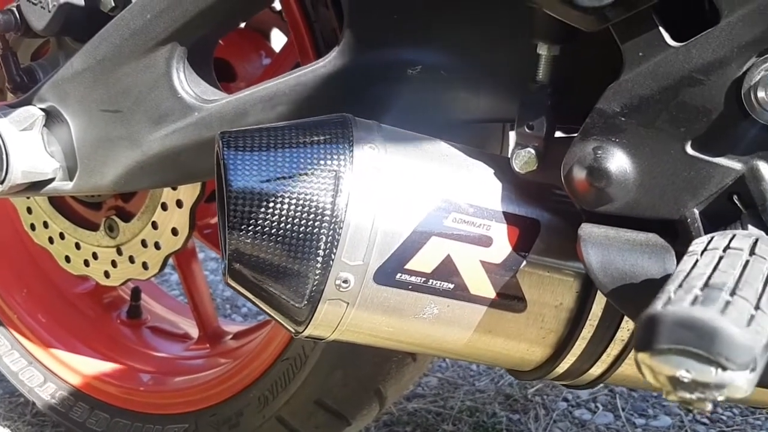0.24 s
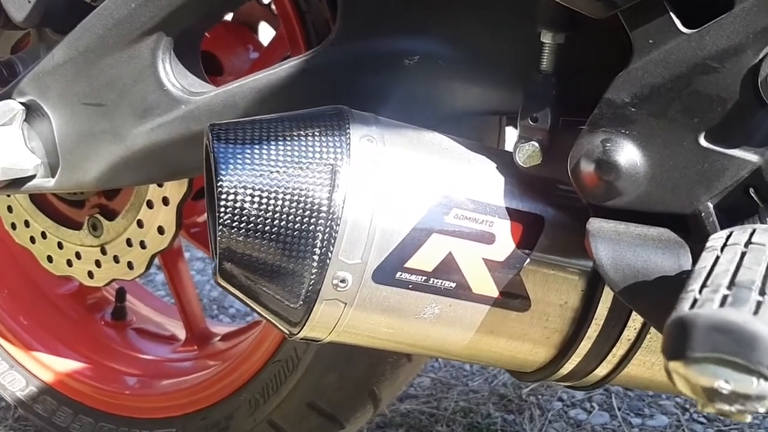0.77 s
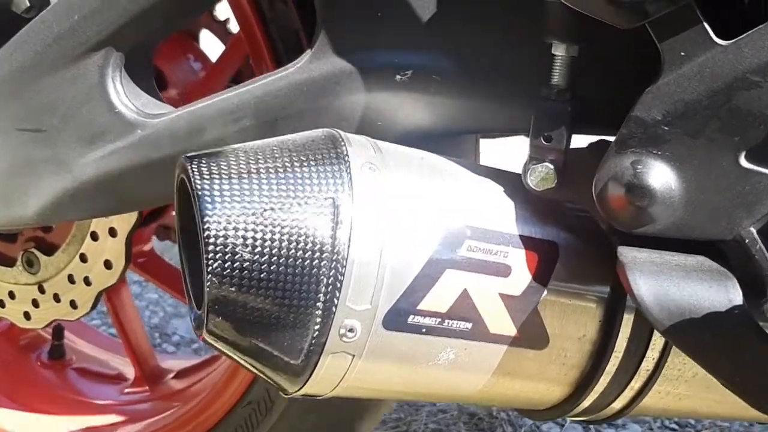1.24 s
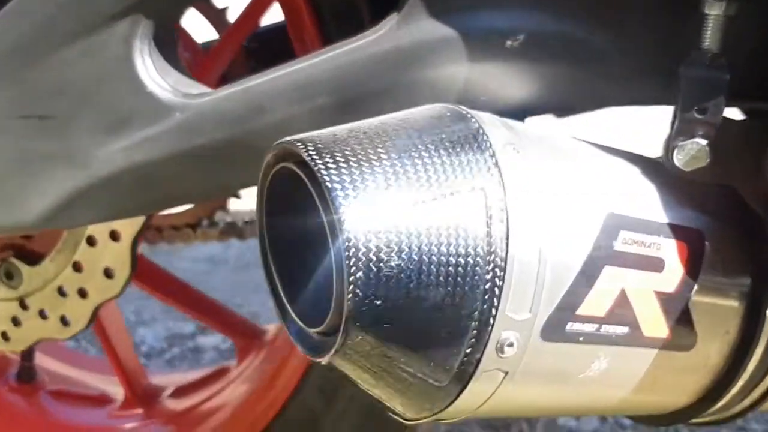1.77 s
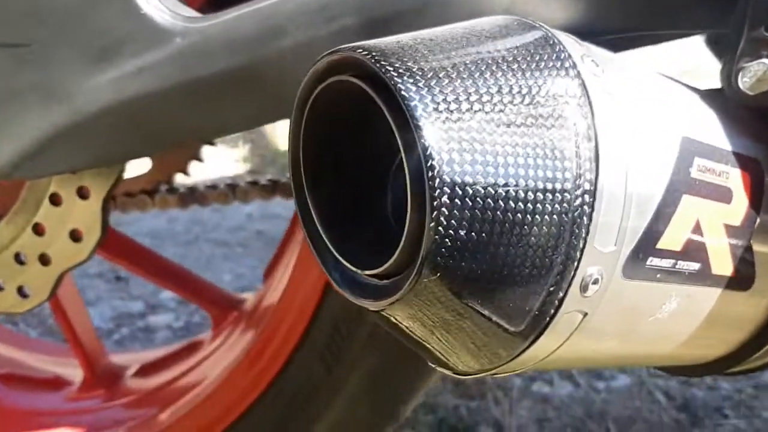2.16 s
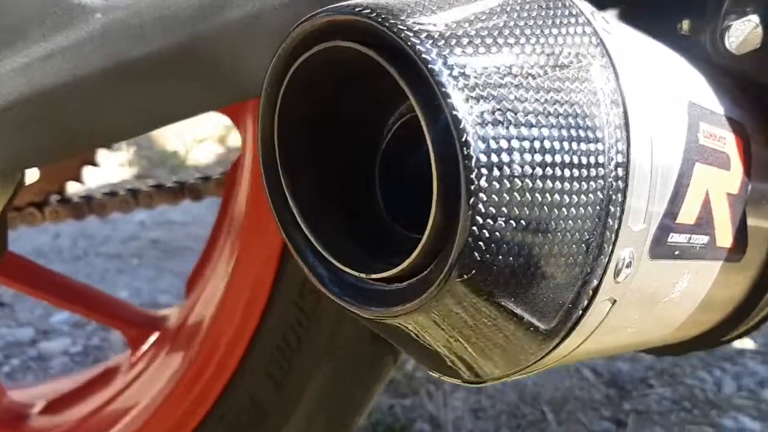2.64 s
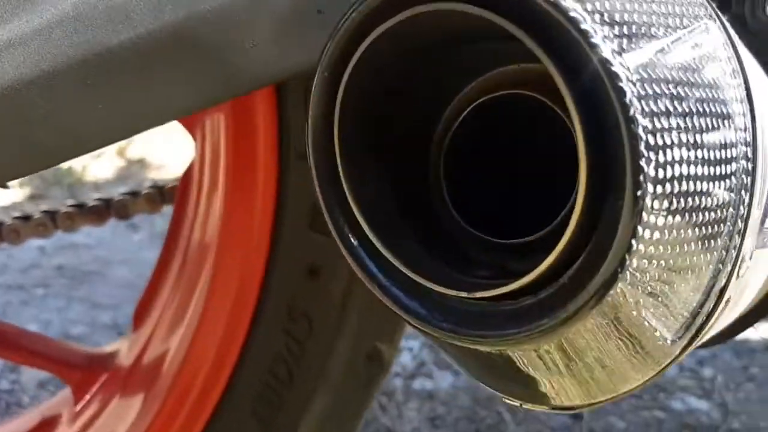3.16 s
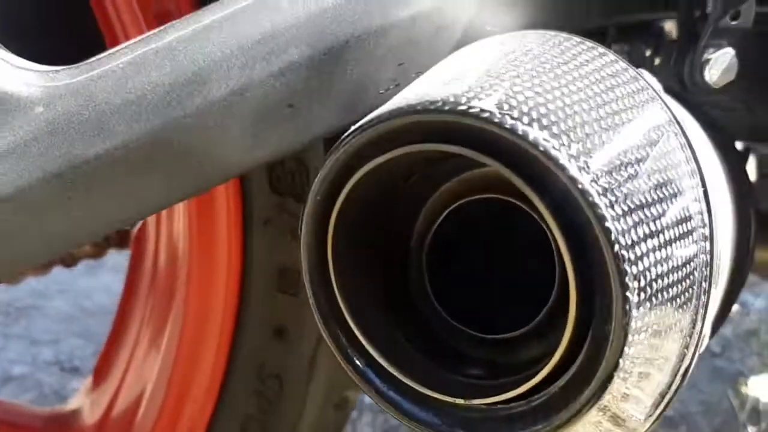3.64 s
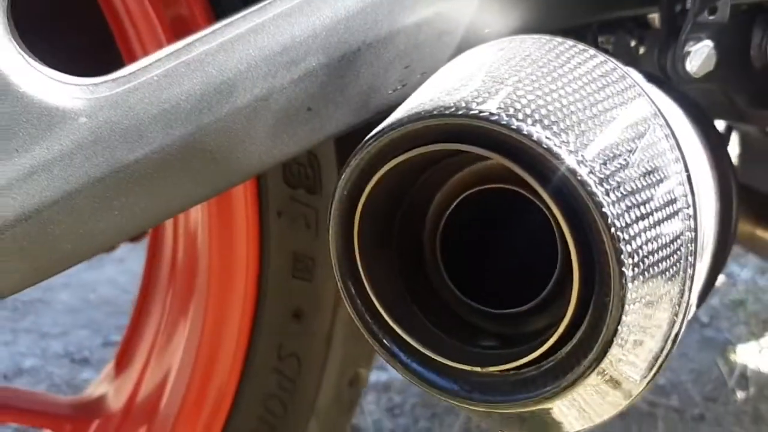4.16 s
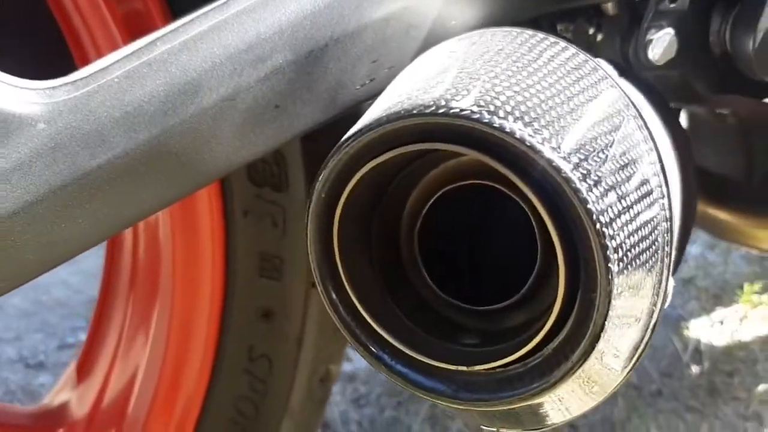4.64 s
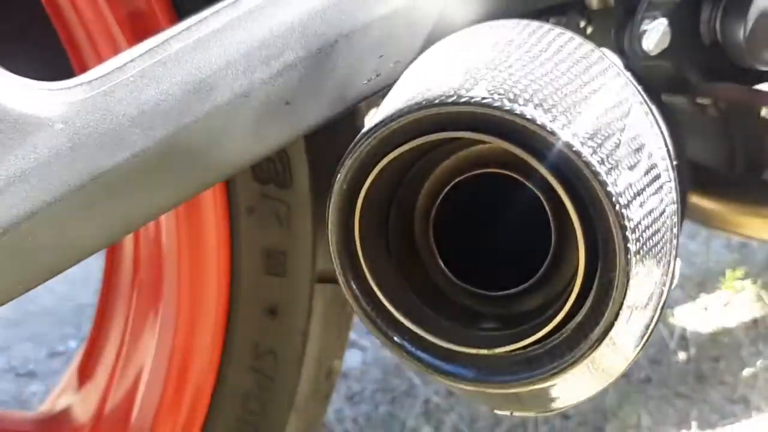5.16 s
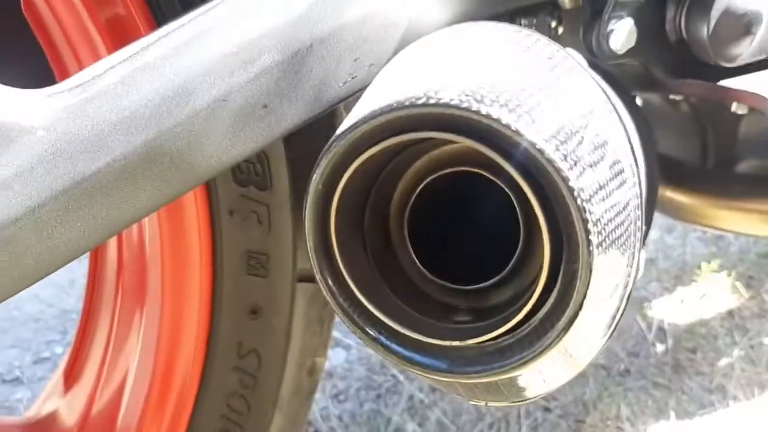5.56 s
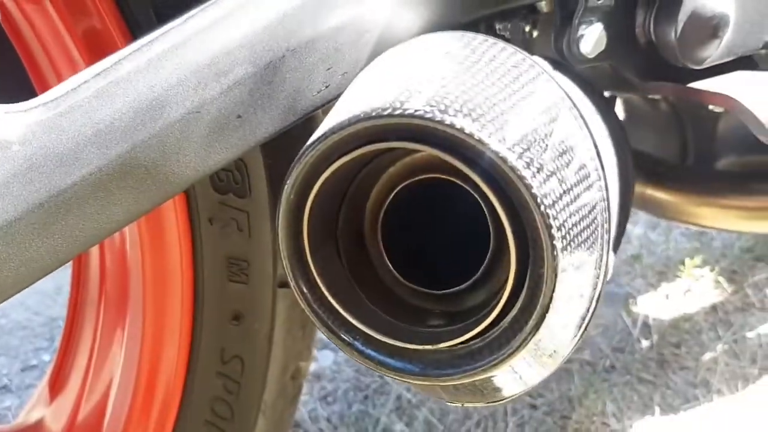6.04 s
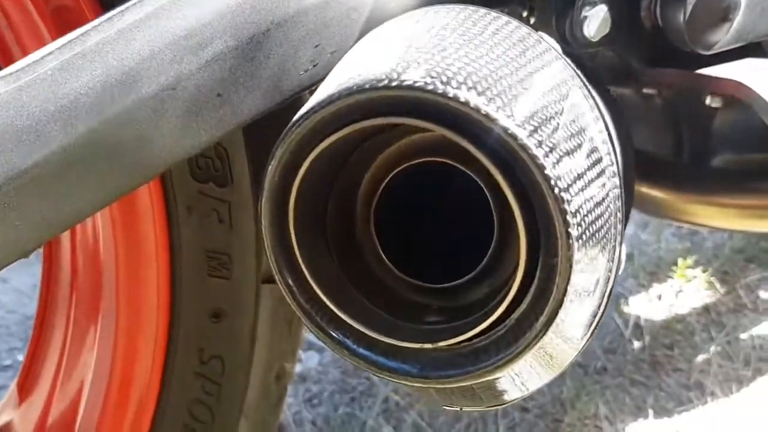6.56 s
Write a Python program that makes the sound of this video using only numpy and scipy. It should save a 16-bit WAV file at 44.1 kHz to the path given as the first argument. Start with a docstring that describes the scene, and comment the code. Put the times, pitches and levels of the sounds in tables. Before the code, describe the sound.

A raspy blip from an uneven-firing twin falls quickly from high revs, its gear whine and clatter gliding downward as individual gulps emerge. A cluster of sharp, clanging backfire cracks breaks through before idle. Then it lopes steadily with paired dull thuds and deep boom. Very close, dry outdoor stereo: gas thumps the microphones mid-way, and later the tone turns brighter, with ticking puffs and short chirps.

```python
"""Motorcycle twin running down to idle

An uneven-firing twin with a short open silencer falls from a throttle blip to a loping idle.
Pressure pulses timed by the crank ring pipe resonances; gated noise makes the rasp, hiss and chuffs.
Sharp cracks and a gear whine colour the run-down; at idle the pipe booms and the outlet chirps.
Two microphone ports move about the outlet, changing level, balance and colour; eddies buffet them."""
import sys
import numpy as np
from scipy import signal
from scipy.fft import rfft, irfft
from scipy.io import wavfile
from scipy.ndimage import uniform_filter1d, map_coordinates

SR = 44100
rng = np.random.default_rng(int(sys.argv[2]) if len(sys.argv) > 2 else 0)


def pcm_store(signal):
    """Save signal as 16-bit PCM."""
    levels = np.round(np.clip(np.atleast_2d(signal), -1, 1) * 32767)
    wavfile.write(sys.argv[1], SR, levels.astype(np.int16).T)


N = 299880
TIME = np.arange(N) / SR
# the throttle shuts, the regular idle firings begin, single cycles catch before that (s)
SHUT_S, IDLE_S, CATCH_S = .135, 2.06, [1.70, 1.91]
TOP_RPM = 10400


def undb(db):
    """Level and amplitude: decibels to linear gain."""
    return 10 ** (np.asarray(db) / 20)


def curve(table, column=1):
    """Linear interpolation of one table column in time."""
    rows = np.array(table, float)
    return np.interp(TIME, rows[:, 0], rows[:, column])


def steady(x):
    """Level normalisation: bring the smoothed running rms to 1."""
    size = SR // 6
    power = np.atleast_2d(x ** 2).mean(0)
    power = uniform_filter1d(uniform_filter1d(power, size), size)
    return x / np.sqrt(np.maximum(power, 1e-4 * power.max()))


def through(x, response):
    """Linear superposition: convolve each channel with an impulse response."""
    return np.apply_along_axis(signal.oaconvolve, -1, x, response)[..., :N]


def colour(x, points, size=4096):
    """Minimum-phase filtering: a causal (Hz, dB) shape of unit power gain."""
    hz, db = np.transpose(points)
    bins = np.fft.rfftfreq(size, 1 / SR)
    gain = undb(np.interp(np.log(bins + 1), np.log(hz), db))
    cepstrum = irfft(np.log(gain / np.sqrt(np.mean(gain ** 2))))
    # folding the cepstrum forward in time makes the response causal
    cepstrum[1:size // 2] *= 2
    cepstrum[size // 2 + 1:] = 0
    return through(x, irfft(np.exp(rfft(cepstrum))))


def ring(x, modes):
    """Modal superposition: a sum of damped resonances."""
    out = 0
    for hz, width, db, sign in modes:
        b, a = signal.iirpeak(hz, hz / width, fs=SR)
        out = out + np.sign(sign) * undb(db) * signal.lfilter(b, a, x)
    return out


def bumps(times, sizes, spread, hz=0):
    """Gaussian pulses; given a pitch, each is a wave packet of random phase."""
    out = np.zeros(N)
    for s, size, w, f in zip(*np.broadcast_arrays(times, sizes, spread, hz)):
        span = slice(*np.searchsorted(TIME, [s - 4 * w, s + 4 * w]))
        t = TIME[span] - s
        swing = np.cos(2 * np.pi * (f * t + rng.random())) if f else 1
        out[span] += size * np.exp(-.5 * (t / w) ** 2) * swing
    return out


def scatter(times, spread_db):
    """Random strength: a log-normal gain for each event."""
    return undb(spread_db * rng.standard_normal(len(times)))


def walks(rate, count):
    """Random modulation: smoothed curves that take a new value rate times a second."""
    size = int(SR / rate)
    values = rng.standard_normal((count, N // size + 1))
    return uniform_filter1d(np.repeat(values, size, axis=1), size)[:, :N]


# The microphones' path about the outlet. Each row: time in seconds, depth in the exhaust jet (0-1),
# facing the bore (0-1).
PLACE = [(1.9, 0.37, 0.1), (2.3, 0.23, 0), (2.65, 0.53, 0.36), (3.0, 1, 0.32), (3.8, 0.88, 0.37),
         (4.25, 0.27, 0.59), (4.8, 0.26, 0.77), (5.6, 0.36, 1), (6.3, 0.16, 0.93), (6.8, 0.47, 1)]


def placed(rule):
    """Near-field directivity: a value beside the silencer, added deep in the jet, added facing the bore."""
    beside, in_jet, facing = rule
    return beside + in_jet * curve(PLACE) + facing * curve(PLACE, column=2)


# left-minus-right level, and delay of the right port, each a rule of place
PAN_DB, PORT_LAG_MS = (-2.5, 7.5, 2.3), (0.376, -0.23, -0.076)


def ports(x):
    """Interaural-style differences: sound reaches the left port first, mostly a little louder."""
    late = map_coordinates(x, [np.arange(N) - placed(PORT_LAG_MS) * SR / 1000], order=3)
    pan_db = placed(PAN_DB)
    return np.array([x * undb(pan_db / 2), late * undb(-pan_db / 2)])


def turbulence(gate, points, shared):
    """Partial coherence: gated gas noise, partly the same at both ports."""
    shared = np.clip(shared, 0, 1)
    common = ports(gate * rng.standard_normal(N))
    separate = gate * rng.standard_normal((2, N))
    return colour(np.sqrt(shared) * common + np.sqrt(1 - shared) * separate, points)


# Modes of the outlet that colour gas noise. Each row: centre in Hz, width in Hz, level in dB, polarity.
OUTLET = [(880, 21, -9, 1), (1627, 117, -5.5, 1), (2660, 420, -1, 1), (4280, 83, -5, 1), (4740, 72, -3, 1),
          (5270, 330, -2.5, 1), (6360, 510, -1.5, 1)]


def outlet(x):
    """Open-end radiation: the outlet rings at its own modes and radiates little bass."""
    bass_cut = signal.butter(3, 300, "high", fs=SR, output="sos")
    return signal.sosfilt(bass_cut, x + ring(x, OUTLET))


# the blip: the crank gains speed on the throttle and levels off
START_RPM, REV_RPM_PER_S = 8906, 15000
# the run-down: exponential drag, with dry friction pulling towards a speed below zero
COAST_RPM, COAST_S, FRICTION_RPM = 10736, 1.609, 1782
# The slight hunting of the idle. Each row: time in seconds, crank speed in rpm.
IDLE_SPEED = [(2, 1395.3), (3.164, 1402.6), (3.476, 1340.4), (3.611, 1393.3), (4.781, 1304.6),
              (5.276, 1366.7), (5.933, 1291.4), (6.8, 1316)]
# Unevenness of the run-down. Each row: time in seconds, speed above the law as a share.
WAVER = [(.3, 0), (.45, .005), (.75, .007), (.95, .003), (1.2, -.014), (1.45, -.005), (1.7, -.003),
         (1.9, .004)]


def speed():
    """Rotational dynamics: crank speed in rpm over a blip, a run-down and the idle that catches it."""
    blip = np.minimum(START_RPM + REV_RPM_PER_S * TIME, TOP_RPM)
    coast = (COAST_RPM + FRICTION_RPM) * np.exp(-(TIME - SHUT_S) / COAST_S) - FRICTION_RPM
    return np.maximum(np.minimum(blip, coast * (1 + curve(WAVER))), curve(IDLE_SPEED))


def throttle():
    """Throttle opening as a control gain: 1 during the blip, 0 once it snaps shut."""
    return np.clip((SHUT_S - TIME) / 0.023 + .5, 0, 1)


# starting phase and the second cylinder's delay, in engine cycles of two crank turns
START_TURN, SECOND_CYLINDER = .199, 3 / 8


def strokes():
    """Four-stroke timing: time, cylinder and burning state of strokes spaced 270 and 450 degrees."""
    cycles = START_TURN + np.cumsum(speed()) / (2 * 60 * SR)
    marks = (np.arange(int(cycles[-1]) + 1)[:, None] + [0, SECOND_CYLINDER]).ravel()
    marks = marks[(marks > cycles[0]) & (marks < cycles[-1])]
    times = np.interp(marks, cycles, TIME)
    caught = np.abs(times[:, None] - CATCH_S).min(1) < .008
    fired = (times > IDLE_S) | caught
    return times, (marks % 1 > 0).astype(int), fired


def with_speed(slow_db, top_db, power):
    """Flow-noise power law: a constant part and a part that grows with speed."""
    return np.hypot(undb(slow_db), undb(top_db) * (speed() / TOP_RPM) ** power)


# Colour of the rasp. Each row: frequency in Hz, level in dB.
RASP = [(200, 8.5), (600, 6), (1100, 3.5), (1400, 2), (1850, 5.5), (2700, 2.5), (3400, -0.5), (4200, -2.5),
        (5400, 0.5), (6700, -6.5), (7900, -11), (10000, -4.5), (15500, -13)]
RASP_DB = -4


def rasp(times):
    """Broadband jet noise: gas tears at the outlet on the throttle, crackling at each stroke."""
    burns = times[times < SHUT_S]
    gate = .5 + bumps(burns, scatter(burns, spread_db=1.0), spread=0.00006)
    return outlet(undb(RASP_DB) * throttle() * turbulence(gate, RASP, shared=0.2))


# Colour of fast flow. Each row: frequency in Hz, level in dB.
SIZZLE = [(300, -8), (3000, 12), (6500, -1), (7900, -7), (9500, 6), (15500, 10)]
SIZZLE_DB = -15.5


def sizzle():
    """Velocity scaling of flow noise: a treble sizzle grows with the cube of speed, up to a ceiling."""
    gate = np.minimum(1.415 * speed() / TOP_RPM, 1) ** 3 * (TIME < IDLE_S)
    return outlet(undb(SIZZLE_DB) * turbulence(gate, SIZZLE, shared=0.045))


# Resonances rung on the overrun. Each row: centre in Hz, width in Hz, level in dB, polarity.
HOWL = [(260, 62, -3.5, -1), (361, 94, -0.5, 1), (460, 63, 5, 1), (513, 133, 1.4, -1), (737, 147, -1.5, -1)]
# The low pipe drone. Each row: centre in Hz, width in Hz, level in dB, polarity.
DRONE = [(129.5, 30, 0, -1)]
# Modes of the silencer's baffles. Each row: centre in Hz, width in Hz, level in dB, polarity.
BAFFLE = [(860, 390, -2, 1), (1620, 130, 10.5, 1), (2550, 350, -2, 1)]
# Colour of the rattling fronts. Each row: frequency in Hz, level in dB.
SNARL = [(200, 0.5), (550, -3.5), (700, 5), (880, -9.5), (1300, -9), (2050, -8), (2700, -14), (3400, -36),
         (5500, -38), (7900, -36), (15000, -6)]
# the howl fades below a knee in speed, weakens on the throttle, and is choked near top speed
HOWL_DB, HOWL_THROTTLE_DB, HOWL_CHOKE_DB = -10.5, -22, -3
HOWL_KNEE_RPM, HOWL_STEEPNESS = 6000, 2.8
# the drone is strongest at one speed and falls by the square of the octaves away from it
DRONE_DB, DRONE_RPM, DRONE_FALL_DB, DRONE_THROTTLE_DB = -16, 4400, 6.5, -13
# the gulps grow uneven below this speed, in strength and timing
STUMBLE_RPM, STUMBLE_DB, STUMBLE_S = 3600, 1.1, .00022
# the second cylinder's pulse arrives a little early and stronger
HEADER_LEAD_S, SECOND_GAIN = .00009, 1.46


def overrun(times, cylinder):
    """Pulse-excited pipe modes: suction and rebound of each gulp howl, and its steep front rattles."""
    stumble = 1 / (1 + (np.interp(times, TIME, speed()) / STUMBLE_RPM) ** 6)
    jitter = (.00002 + STUMBLE_S * stumble) * rng.standard_normal(len(times))
    times = times - HEADER_LEAD_S * cylinder + jitter
    size = scatter(times, spread_db=.6 + STUMBLE_DB * stumble) * np.where(cylinder, SECOND_GAIN, 1)
    suction = bumps(times + 0.0007, size, spread=0.00025)
    rebound = bumps(times + 0.0018, 1.15 * size, spread=0.00024)
    gulp = rebound - suction

    howl_db = HOWL_DB + HOWL_THROTTLE_DB * throttle() + HOWL_CHOKE_DB * (speed() / TOP_RPM) ** 6
    howl_gain = undb(howl_db) / np.hypot(1, (HOWL_KNEE_RPM / speed()) ** HOWL_STEEPNESS)
    howl = steady(ring(gulp, HOWL)) * howl_gain
    octaves = np.log2(speed() / DRONE_RPM)
    drone_gain = undb(DRONE_DB + DRONE_THROTTLE_DB * throttle() - DRONE_FALL_DB * octaves ** 2)
    drone = steady(ring(gulp, DRONE)) * drone_gain

    # the baffles scatter every front alike, so the upper harmonics glide with the engine
    baffles = (rng.standard_normal(N) * np.exp(-TIME / .0018))[:SR // 20]
    fronts = bumps(times + .002, scatter(times, spread_db=1), spread=.00002)
    fronts = through(fronts, baffles)
    snarl = steady(outlet(colour(fronts + ring(fronts, BAFFLE), SNARL)))
    return ports(howl + drone + snarl * with_speed(slow_db=-43, top_db=-19.5, power=1.0))


# Notes of single puffs. Each row: pitch in Hz, spread in seconds, overrun level in dB, then the idle
# level in dB beside the silencer, dB added deep in the jet, dB added facing the bore.
WHISTLES = [(873, 0.0019, -17.5, -36, -3.5, 0), (1600, 0.0015, -20, -39, -15, -2),
            (2510, 0.0011, -28, -53, -4, -7), (5300, 0.0023, -39, -46, -11, 8)]
# above about this speed the gulps run together and sing less
WHISTLE_RPM = 4750


def notes(times, hz, spread, scatter_db):
    """Short wave packets near one pitch, each with its own strength and tuning."""
    tuning = np.exp(.04 * rng.standard_normal(len(times)))
    return bumps(times, scatter(times, scatter_db), spread, hz * tuning)


def whistles(gulps, firings):
    """Transient resonance: each gulp, and two eddies per firing, set the outlet singing briefly."""
    eddies = (firings[:, None] + [.008, .019]).ravel()
    apart = 1 / np.hypot(1, (speed() / WHISTLE_RPM) ** 3)
    out = 0
    for hz, spread, overrun_db, *rule in WHISTLES:
        out = out + notes(gulps + .0045, hz, spread, scatter_db=0.5) * undb(overrun_db) * apart
        jittered = eddies + 0.0035 * rng.standard_normal(len(eddies))
        out = out + notes(jittered, hz, spread, scatter_db=8) * undb(placed(rule))
    return ports(out)


# Colour of the knocks. Each row: frequency in Hz, level in dB.
CLATTER = [(500, 6), (1100, -13), (1300, -4.5), (1650, -0.5), (2050, 4.5), (2700, 2), (3200, -8.5),
           (3850, 5.5), (4500, 0.5), (5400, 1), (7000, -4), (15000, -29)]
# level at top speed, its power law with speed, and the change on the throttle
CLATTER_DB, CLATTER_POWER, CLATTER_THROTTLE_DB = -16, 2.1, -1


def clatter(tail_s=0.011):
    """Periodic impact: pistons and gears knock alike each turn, making gliding high harmonics."""
    turns = np.cumsum(speed()) / (60 * SR)
    times = np.interp(np.arange(1, turns[-1]), turns, TIME)
    knocks = bumps(times, scatter(times, spread_db=1), spread=.00002)
    casing = (rng.standard_normal((2, N)) * np.exp(-TIME / tail_s))[:, :SR // 20]
    sound = colour(np.array([through(knocks, side) for side in casing]), CLATTER)
    gain = undb(CLATTER_DB + CLATTER_THROTTLE_DB * throttle())
    return steady(sound) * gain * (speed() / TOP_RPM) ** CLATTER_POWER


# Gear and chain lines. Each row: multiple of the crank speed, level in dB before flutter and outlet.
GEARS = [(11, -34), (13, -36), (14, -35), (16, -30), (17, -32), (19, -35), (21, -38), (23, -32), (24, -36),
         (28, -38)]


def gears(flutter_db=6.5, power=1.5):
    """Order-locked tones: gears and cam chain whine at multiples of crank speed, fluttering and fading."""
    turns = np.cumsum(speed()) / (60 * SR)
    out = 0
    for order, db in GEARS:
        loudness, phase = walks(40, count=2)
        tone = np.sin(2 * np.pi * order * turns + phase / 2)
        out = out + undb(db + flutter_db * loudness) * tone
    return ports(outlet(out) * (speed() / TOP_RPM) ** power)


# Colour of the rustle. Each row: frequency in Hz, level in dB.
MACHINE = [(30, -55), (120, 14), (400, 8), (1000, 0.5), (2500, -6), (4300, -7.5), (5400, -6), (6500, -16.5),
           (7700, -23.5), (10000, -21.5), (15500, -21.5)]
MACHINE_DB = (-39, 4.5, 3.5)  # rule of place


def machinery():
    """Stationary noise: the valve train and gears rustle steadily behind the exhaust."""
    return undb(placed(MACHINE_DB)) * turbulence(np.ones(N), MACHINE, shared=0.083)


# Pops in the pipe. Each row: time in seconds, peak in dB, pitch in Hz, spread in seconds.
POPS = [(.006, -4.5, 580, 0.0027), (.022, -11, 686, 0.0042), (.045, -7, 1110, 0.0046),
        (.048, -17, 2600, 0.0041), (.085, -17, 2800, .003), (.107, -8, 2750, 0.0023),
        (.145, -5.5, 517, 0.0034), (.175, -11, 575, 0.0099), (.177, -14, 740, 0.0054),
        (1.071, -8, 826, 0.0011), (1.143, -12, 830, 0.0024), (1.193, -7, 840, 0.0014),
        (1.360, -6, 860, 0.00089), (1.475, -10, 835, 0.0012), (1.878, -5.5, 730, 0.00081),
        (2.147, -10.5, 950, 0.0022), (2.212, -13.5, 854, 0.0013), (3.602, -21, 810, 0.0013),
        (3.811, -22, 865, 0.004)]


def pops():
    """Impulsive combustion: unburnt fuel barks unevenly in the blip, then in single hollow pops."""
    s, db, hz, spread = np.transpose(POPS)
    return ports(bumps(s, undb(db), spread, hz))


def flicker(x, depth_db):
    """Spectral modulation: each band of the gas noise wanders in level on its own."""
    edges = [700, 1100, 1500, 2000, 2800, 3700, 4600, 5500, 7000]  # Hz
    lows = [signal.sosfiltfilt(signal.butter(6, hz, fs=SR, output="sos"), x) for hz in edges]
    bands = np.diff([0 * x, *lows, x], axis=0)
    gains = undb(depth_db * walks(50, count=len(bands)))
    return (bands * gains[:, None]).sum(0) / np.sqrt(np.mean(gains ** 2))


# Colour of the overrun hiss. Each row: frequency in Hz, level in dB.
RUSH = [(300, 11.5), (650, 6.5), (850, 9.5), (1250, 4), (1650, 4.5), (2050, -3), (2700, -2.5), (3300, -11),
        (4300, -5.5), (5600, 0), (6700, -10.5), (7900, -18), (9500, -13.5), (15500, -16)]
# a gulp lasts longer as the crank slows: its spread at one speed, and the power of the law
GULP_S, GULP_RPM, GULP_POWER = .0023, 3000, .6
# below this speed the gulps lose their force
SPENT_RPM = 2550


def rush(coast):
    """Amplitude-modulated flow noise: a hiss per gulp, merging into one stream at high speed."""
    gulp_s = GULP_S * (GULP_RPM / np.interp(coast, TIME, speed())) ** GULP_POWER
    stream = (speed() / TOP_RPM) ** 1.45 * (TIME < IDLE_S)
    gulps = stream + bumps(coast + 0.0055, scatter(coast, spread_db=1.5), gulp_s)
    hiss = turbulence(steady(gulps), RUSH, shared=0.5)
    hiss = hiss * with_speed(slow_db=-18, top_db=-14, power=6.3)
    hiss = hiss * np.minimum(speed() / SPENT_RPM, 1) ** 1.4
    return outlet((1 - throttle()) * flicker(hiss, depth_db=3.5))


# Pipe colour of the backflow. Each row: frequency in Hz, level in dB.
BURBLE = [(25, -23), (70, -16), (130, -6), (190, 4.5), (330, -2.5), (560, -7.5), (900, -26), (3000, -50)]


def burble(gulps):
    """Low-frequency turbulence: backflow tumbles after each gulp and roughens the run-down."""
    gate = bumps(gulps + .004, scatter(gulps, spread_db=2.5), spread=0.0081)
    rumble = steady(turbulence(gate, BURBLE, shared=.7)) * undb(-29)
    return rumble * np.minimum(speed() / 4200, 1) * (1 - throttle())


# Gulps whose rebound steepens. Each row: time in seconds, spike peak in dB.
CRACKS = [(1.0269, -7), (1.0476, -22), (1.0714, -10), (1.086, -7), (1.0926, -14), (1.1178, -6),
          (1.1435, -10), (1.193, -4), (1.235, -1.5), (1.2625, -2), (1.319, -4), (1.3295, -4), (1.348, -4),
          (1.360, -3), (1.4085, -5.5), (1.4435, -10), (1.4733, -13), (1.5078, -7), (1.5424, -7),
          (1.556, -14), (1.651, -12), (1.6675, -10), (1.748, -16), (1.863, -21), (1.982, -8.5)]
# Silencer modes rung by a crack. Each row: centre in Hz, width in Hz, level in dB, polarity.
CLANG = [(896, 54, 9.5, 1), (1530, 130, 0, 1), (2430, 160, 12.5, 1), (2640, 130, 6, 1), (5380, 400, 1, 1)]


def cracks():
    """Wave steepening: a sharp pressure spike leaves the pipe and sets the silencer clanging."""
    s, db = np.transpose(CRACKS)
    spikes = bumps(s, undb(db), spread=.00007)
    tearing = bumps(s + .0012, undb(db - 19), spread=.0011) * rng.standard_normal(N)
    return ports(spikes + ring(spikes + tearing, CLANG))


# Pipe resonances rung by a firing. Each row: centre in Hz, width in Hz, level in dB, polarity.
PIPE = [(136, 73, -12, 1), (306, 55, -0.5, 1), (320, 39, 8.5, 1), (468, 132, 13, -1), (870, 73, 3.5, 1)]
# The silencer's deep modes. Each row: centre in Hz, width in Hz, level in dB, polarity.
BOOM = [(59, 11, -9, 1), (100.5, 31, 3.5, -1), (129.5, 12.4, 4.5, 1), (161, 54, -0.5, 1)]
BARK_DB, BOOM_DB = (-29, -3, 6), (-35.5, 22.5, -1.5)  # rules of place
# the crank labours up to the first firing, which comes late, and is kicked on to the second
FIRST_LAG_S, SECOND_LAG_S = .003, .0014


def idle(times, cylinder):
    """Impulse response of a pipe: blowdown and surge bark, and the piston's push sustains the boom."""
    lag_s = np.where(cylinder, SECOND_LAG_S, FIRST_LAG_S)
    times = times + lag_s + .0005 * rng.standard_normal(len(times))
    size = scatter(times, spread_db=1.1) * np.where(cylinder, .9, 1)
    blowdown = bumps(times, size, spread=0.00078)
    surge = 3.73 * bumps(times + 0.00628, size, spread=0.0015)
    bark = steady(ring(blowdown + surge, PIPE))
    push_s = np.where(cylinder, .0158, .0140) + 0.00067 * rng.standard_normal(len(times))
    push = bumps(times + push_s, size * scatter(times, spread_db=4.5), spread=0.0013)
    boom = steady(ring(blowdown + 0.72 * push, BOOM))
    catching = undb(-4 * (TIME < IDLE_S))  # the lone early firings are weak
    return catching * ports(bark * undb(placed(BARK_DB)) + boom * undb(placed(BOOM_DB)))


# The strongest eddies at the left port. Each row: time in seconds, peak in dB, spread in seconds.
BUFFETS = [(3.111, -4, 0.0013), (3.196, -8, .0015), (3.336, -2, 0.0015), (3.633, 3.5, 0.0013),
           (3.816, -5, 0.001), (4.126, 1.5, 0.0015), (5.243, -1, 0.0025), (5.747, -3.5, .006),
           (5.781, 0.5, 0.0028), (6.75, -2, 0.0022)]
# Colour of spitting gas. Each row: frequency in Hz, level in dB.
CRACKLE = [(100, -11), (400, 2), (1000, -4), (2000, -11.5), (4000, -20.5), (7000, -37), (15000, -36)]
EDDY_DB = (-31, 18, 13)  # rule of place
BUFFET_HZ = 300


def buffets(times):
    """Hydrodynamic pseudo-sound: eddies of each puff thump the ports independently; the hardest crackle."""
    jet = undb(placed(EDDY_DB))
    eddies = (times[:, None] + [.013, .020, .026]).ravel()
    out = []
    for port_db in (0., -3.):
        timing, tuning = rng.standard_normal((len(eddies), 2)).T
        pitch = 200 * np.exp(0.29 * tuning)
        thumps = bumps(eddies + 0.00195 * timing, scatter(eddies, spread_db=1.5), spread=0.0019, hz=pitch)
        out.append(jet * undb(port_db) * thumps)
    s, db, spread = np.transpose(BUFFETS)
    hard = bumps(s, undb(db), spread, hz=BUFFET_HZ)
    crackle = bumps(s, undb(db - 16.0), spread=0.0015) * rng.standard_normal(N)
    out[0] = out[0] + hard + colour(crackle, CRACKLE)
    return np.array(out)


# Surges of gas in an idle cycle. Each row: cylinder, delay in seconds, spread in seconds,
# relative level in dB.
SURGES = [(0, 0.01, 0.0017, -2.5), (0, 0.021, 0.0047, -4.5), (1, 0.0026, 0.0025, -2),
          (1, 0.01096, 0.00065, 3), (1, .0185, .0025, -3), (1, 0.0259, 0.002, -1)]
# Colour of the chuffs. Each row: frequency in Hz, level in dB.
CHUFF = [(300, 4), (620, -1), (870, 0.5), (1300, -7.5), (1680, -3.5), (2300, -17), (3100, -18),
         (4200, -19.5), (5200, -18), (6400, -20.5), (7700, -36), (9500, -30), (15500, -34)]
CHUFF_DB = (-34, 6.5, 6.5)  # rule of place


def chuffs(times, cylinder):
    """Gated jet noise: each firing's surges of gas break into crisp ticks at the outlet."""
    gate = 0
    for which, delay, spread, db in SURGES:
        own = times[cylinder == round(which)]
        jittered = own + delay + 0.0016 * rng.standard_normal(len(own))
        gate = gate + bumps(jittered, undb(db) * scatter(own, spread_db=2.0), spread)
    gate = gate * undb(3.6 * walks(600, count=1)[0])
    effort = (speed() / curve(IDLE_SPEED)) ** 2.2  # firings above idle speed blow harder
    gate = steady(gate) * effort * (TIME > IDLE_S)
    chuff = turbulence(gate, CHUFF, shared=0.25) * undb(placed(CHUFF_DB))
    return outlet(beamed(flicker(chuff, depth_db=4.0)))


# Bands that the bore beams unevenly. Each row: centre in Hz, width in Hz, dB beside the silencer,
# dB added deep in the jet, dB added facing the bore.
BEAMS = [(1710, 1600, -3.5, -6.5, 6), (2610, 530, -4, 9.5, 1), (4160, 710, -5, -0.5, 7.5)]


def beamed(x):
    """Frequency-dependent directivity: the chuffs change colour as the ports move round the outlet."""
    out = x
    for hz, width, *rule in BEAMS:
        band = ring(x, [(hz, width, 0, 1)])
        out = out + band * (undb(placed(rule)) - 1)
    return out


# The sharpest spits of gas. Each row: time in seconds, level in dB, left minus right in dB.
SPITS = [(2.144, -14.5, 3), (2.171, -21, 6), (3.196, -16.5, 18.5), (3.355, -20, 27.5), (3.512, -16, 13),
         (3.602, -16, 24), (3.811, -17.5, 26), (5.494, -16.5, 11.5), (5.575, -16, 1), (6.032, -17.5, -5),
         (6.758, -17, 15), (6.79, -16.5, 19.5)]


def spits():
    """Impulsive noise: short spits of gas strike the two ports with unequal strength."""
    s, db, pan_db = np.transpose(SPITS)
    gates = np.array([bumps(s, undb(db + side * pan_db / 2), spread=0.0013) for side in (1, -1)])
    return colour(gates * rng.standard_normal((2, N)), CRACKLE)


# Chirps of the outlet at idle. Each row: time in seconds, peak in dB, pitch in Hz, spread in seconds.
CHIRPS = [(4.858, -24, 1760, 0.0017), (5.283, -29, 5200, 0.0018), (5.472, -10, 1700, 0.0019),
          (5.472, -22, 2800, 0.0012), (5.546, -24, 1610, .002), (5.574, -19, 1700, .002),
          (5.636, -21, 5000, 0.0013), (5.663, -23, 1750, .0025), (5.82, -24, 5100, 0.0017),
          (6.001, -23.5, 6370, .002), (6.032, -18, 1680, .002), (6.218, -29, 1680, .002),
          (6.281, -20, 5170, .002), (6.311, -20, 1680, 0.0016), (6.557, -15, 1640, .002),
          (6.649, -26, 4080, 0.0015)]


def chirps(width_share=0.12):
    """Noise-excited resonance: a sharp puff rings one outlet mode, with a small tick at its front."""
    out = 0
    for s, db, hz, spread in CHIRPS:
        puff = bumps([s], 1, spread) * rng.standard_normal(N)
        rung = ring(puff, [(hz, hz * np.clip(width_share, .05, .5), 0, 1)])
        out = out + undb(db) * rung / np.abs(rung).max()
    s, db, hz, spread = np.transpose(CHIRPS)
    tick = bumps(s - spread / 2, undb(db - 9), spread=0.00062) * rng.standard_normal((2, N))
    return ports(out) + colour(tick, CHUFF)


def scene():
    """Superposition of exhaust, gas and engine at the two ports."""
    times, cylinder, fired = strokes()
    gulps, firings = times[~fired], times[fired]
    pipe = overrun(gulps, cylinder[~fired]) + pops() + burble(gulps) + cracks()
    pipe = pipe + idle(firings, cylinder[fired])
    gas = rasp(times) + sizzle() + rush(gulps) + chuffs(firings, cylinder[fired])
    jet = gas + whistles(gulps, firings) + buffets(firings) + spits() + chirps()
    engine = clatter() + gears() + machinery()
    return pipe + jet + engine


TOP_HZ = 15800


def record(dry):
    """Clipping and band-limiting: the tallest peaks are flattened and the top treble is cut."""
    top_cut = signal.ellip(10, .2, 70, TOP_HZ, fs=SR, output="sos")
    return signal.sosfilt(top_cut, np.clip(dry, -1, 1))


dry = scene()
out = record(dry)
pcm_store(out)
```